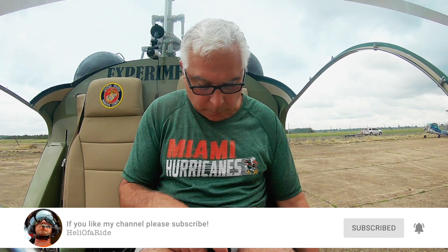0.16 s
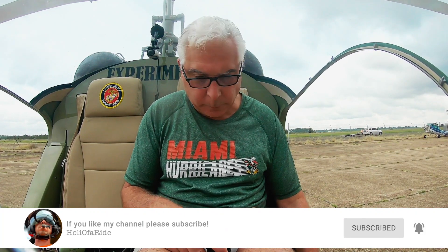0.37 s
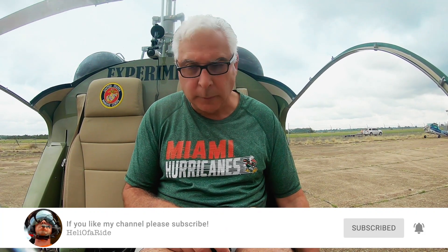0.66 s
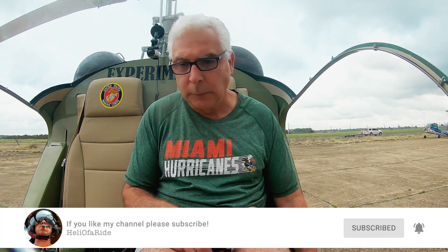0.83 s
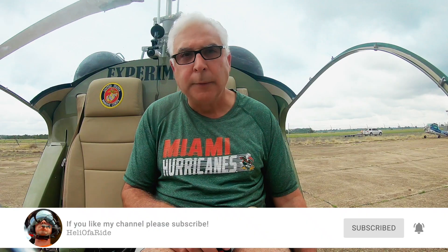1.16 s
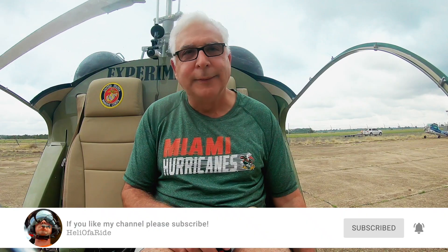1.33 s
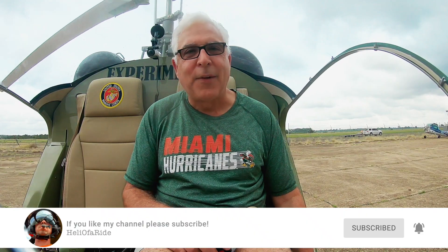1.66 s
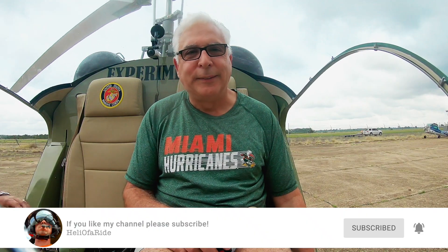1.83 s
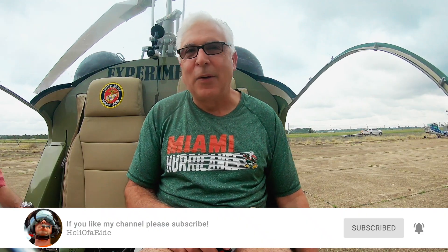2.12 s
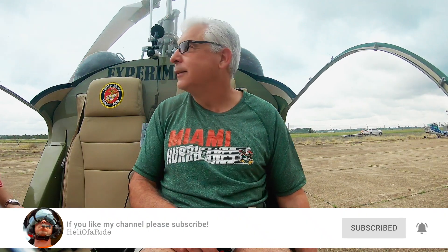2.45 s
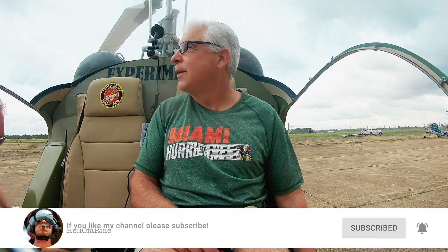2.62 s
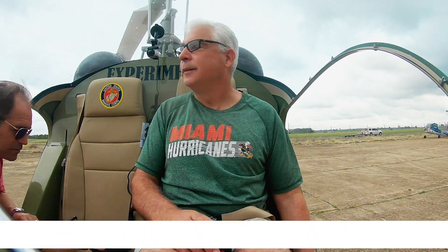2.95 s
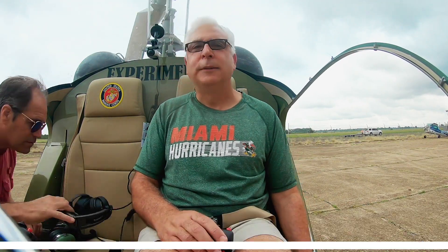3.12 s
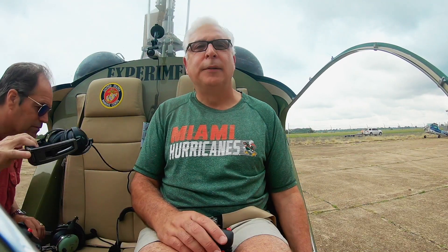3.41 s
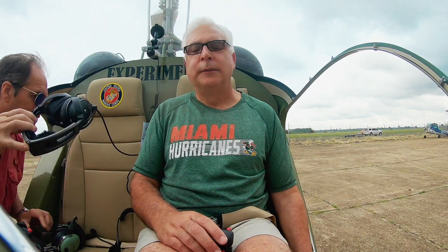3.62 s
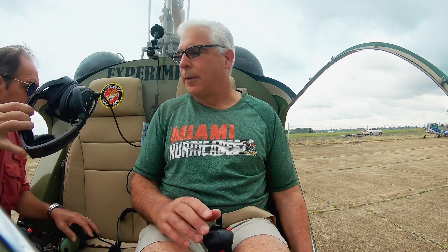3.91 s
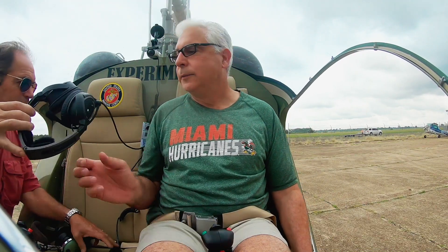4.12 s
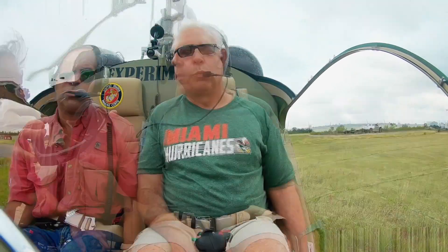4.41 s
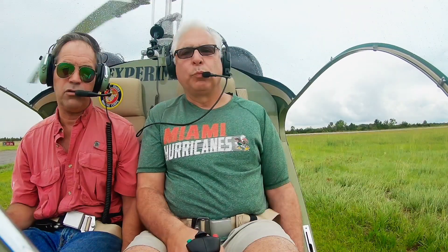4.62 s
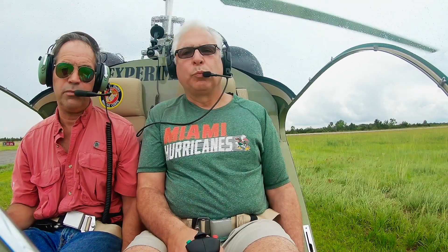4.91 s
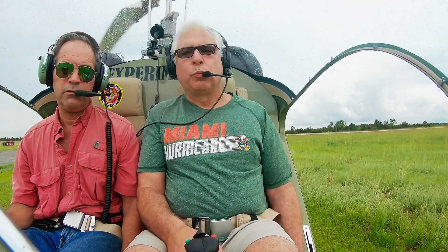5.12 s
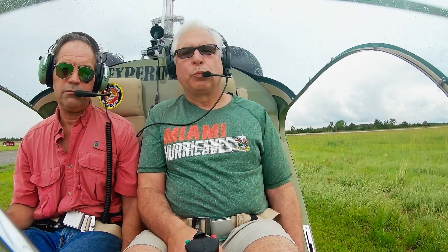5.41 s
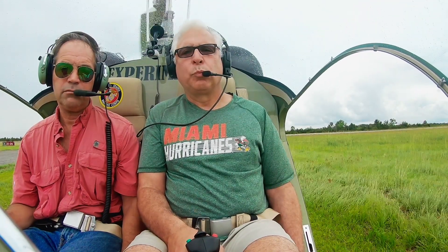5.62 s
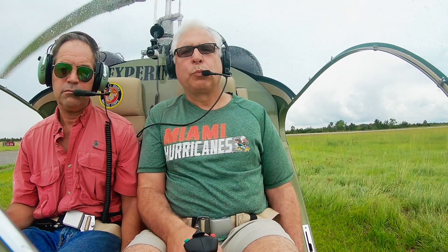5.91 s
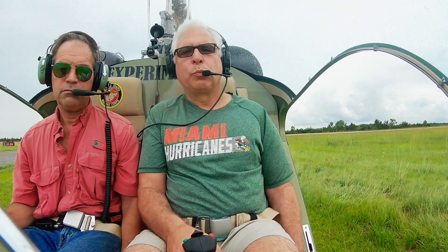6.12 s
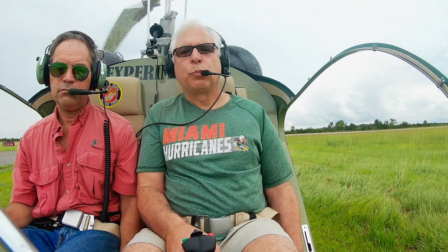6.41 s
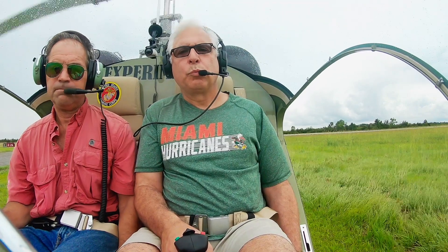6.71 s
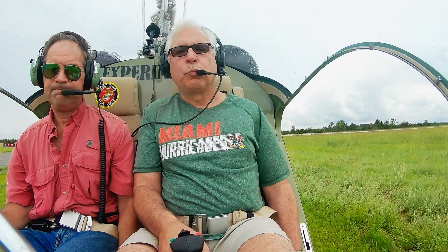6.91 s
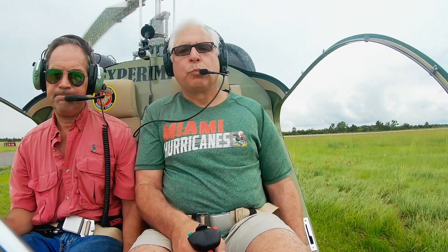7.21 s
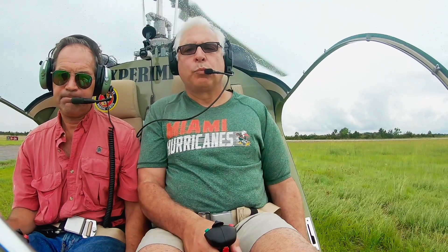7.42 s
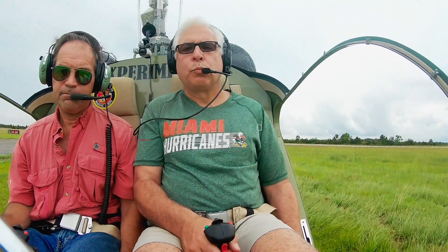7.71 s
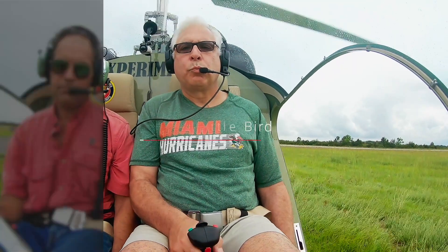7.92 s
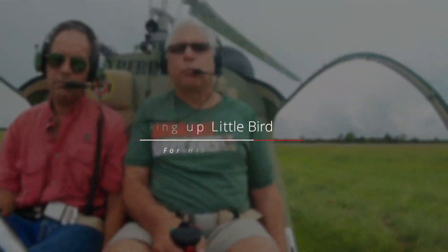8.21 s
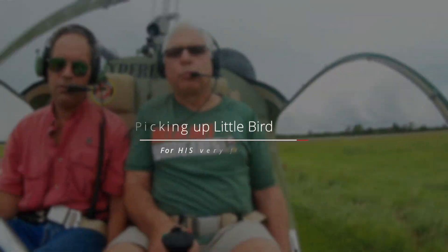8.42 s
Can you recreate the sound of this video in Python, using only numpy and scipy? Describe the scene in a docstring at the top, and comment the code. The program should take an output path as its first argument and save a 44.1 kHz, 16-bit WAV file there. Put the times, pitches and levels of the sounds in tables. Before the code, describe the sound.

Heard close up from the seats of an open helicopter outdoors, a piston engine lopes unevenly at idle, its low exhaust throb mixed with ringing knocks, rattling covers and faint ticking. It briefly races and falters. Midway, a quick change brings a higher, even drone with an exhaust rasp, and rushing air from the rotor gradually builds beneath it as the engine takes up load.

```python
"""Piston helicopter, open cockpit

An eight-cylinder engine is heard from just in front of the seats. At idle, unequal firings give a
lopping, stumbling exhaust boom, impacts ring the casing, the valve train hisses and gear rustles.
The scene then changes to a faster, fuller run on a field: periodic firings make a line spectrum and a
rasp, and the turbulent wash of the rotor slowly grows as it takes up load."""
import sys
import numpy as np
from scipy import signal
from scipy.fft import rfft, irfft
from scipy.io import wavfile

SR = 44100
rng = np.random.default_rng(int(sys.argv[2]) if len(sys.argv) > 2 else 0)


def inscribe(sig):
    """Save sig as 16-bit PCM at rate SR to the path in sys.argv[1].

    A 1-D sig is mono; a 2-D sig holds one channel per row.
    Samples are clipped to [-1, 1] before scaling.
    """
    pcm = np.round(np.clip(np.atleast_2d(sig).T, -1, 1) * 32767)
    wavfile.write(sys.argv[1], SR, pcm.astype(np.int16))


N = 377055
T = np.arange(N) / SR

# gear handled in the cabin: centre_s, length_s, level_db
GEAR_RUSTLES = [(.81, 0.047, -74), (2.618, 0.023, -69), (2.647, 0.045, -67), (2.876, 0.036, -72),
                (3.47, 0.046, -74)]
# spectral envelopes of the noises, as relative densities: frequency_hz, level_db
RUSTLE_SPECTRUM = [(2000, -16), (3500, -11), (5200, 2.5), (7000, -11.5), (9500, -18), (13000, -31)]
TAPPET_SPECTRUM = [(3800, -10.5), (5300, 7), (7000, -7.5), (9000, -10.5), (11500, -27), (14000, -39)]
VALVE_SPECTRUM = [(1760, -30.5), (3000, -14.5), (3600, -18), (4420, -4), (5320, -1.5), (6000, -3.5),
                  (7020, -19.5), (9130, -29), (15400, -120)]
CLATTER_SPECTRUM = [(500, -27.5), (700, 17.5), (1100, -9), (1400, -7), (1850, -9.5), (2300, -17.5),
                    (3000, -25), (4000, -46)]
RUMBLE_SPECTRUM = [(15, -23.5), (30, -7.5), (50, -5.5), (75, 1), (100, -1.5), (125, -6), (150, -15),
                   (185, -7), (220, -17), (270, -10), (320, -19), (420, -24), (580, -21), (900, -23.5)]
RUN_HISS_SPECTRUM = [(1500, -30), (2400, -5), (3130, -13), (3520, -14), (4600, -2), (5000, -2), (5840, -4),
                     (7020, -17), (8300, -21), (9500, -28), (11300, -41), (12800, -39), (14500, -48)]
WASH_SPECTRUM = [(8, -8), (35, -3), (60, 1), (100, 1), (130, -7.5), (170, -1.5), (260, -3.5), (330, -8),
                 (400, -13.5), (650, -11.5), (1000, -14.5), (1600, -22.5), (3000, -45.5)]
BARK_SPECTRUM = [(250, -17), (340, -1.5), (400, -9), (480, -1), (580, -9), (660, -6), (780, -3.5),
                 (900, -4), (1000, -3.5), (1120, -9), (1400, -12.5), (1900, -16.5), (2400, -28),
                 (3200, -46)]
# slow hunting of the idle: time_s, firing_rate_hz
IDLE_FIRING_RATE = [(0, 67.24), (0.65, 62.81), (1, 66.0), (1.3, 63.53), (1.8, 66.93), (2.3, 64.72),
                    (2.9, 66.47), (3.5, 65.46)]
# the idle races briefly, then runs weak: centre_s, extra_rate_hz, boom_loss_db
IDLE_SURGES = [(1.57, 8.67, 2.5), (3.2, 3.8, 5)]
# the cylinders at idle, in firing order: boom_db, lateness_firings
FIRING_ORDER = [(3, -0.011), (2, 0.056), (1.5, -0.067), (2.7, -0.019), (1.3, -0.058), (-2.5, 0.12),
                (3.4, -0.00062), (0.5, 0.095)]
# brief dips of the boom: time_s, boom_loss_db
BOOM_DIPS = [(.197, 20), (0.579, 3.5), (.94, 7), (1.785, 8), (2.51, 5), (2.904, 15), (2.995, 16),
             (3.17, 11), (3.24, 18), (3.35, 3)]
# modes of the engine casing: pitch_hz, bandwidth_hz, gain_db
CASING_MODES = [(659.6, 12, 24.5), (710, 36, 8), (775.7, 11, 21.5), (815, 29, -12.5), (900, 110, -15)]
# modes of the thin engine covers: pitch_hz, bandwidth_hz, gain_db
COVER_MODES = [(960, 52, 6), (1050, 140, -11.5), (1130, 93, -6.5), (1310, 5.7, 1), (1480, 40, -13.5),
               (1690, 100, -22.5)]
# knocks of one engine cycle: place_firings, pitch_hz, gain_db
CYCLE_KNOCKS = [(.4, 691, -4), (1.3, 749, -3.5), (3.0, 950, -8), (3.4, 785, -1), (4.099, 973, -8),
                (4.351, 787, -1.5), (5.449, 722, -3.5), (6.2, 1005, -10.5), (6.45, 787, -3), (7.3, 761, -3),
                (7.549, 667.5, -4)]
# moments when the knocks change in force, nearly all harder: time_s, gain_db
KNOCK_ACCENTS = [(0.236, 4.5), (0.58, 1), (1.044, 4.5), (1.29, 6.5), (1.416, 6), (1.535, 7.5), (1.565, 8),
                 (1.595, 5.5), (1.647, 7), (1.944, 5), (2.066, 6), (2.25, 3), (2.558, 2), (2.737, 4.5),
                 (2.861, 4.5), (3.041, 3.5), (3.276, -2)]
# upward creep of the fast run: time_s, firing_rate_hz
RUN_FIRING_RATE = [(4.4, 88.87), (6.3, 89.83), (7.3, 90.12), (7.8, 90.6), (8.55, 90.9)]
# lines of the fast run, the fractional ones drive-train hums: crank_multiple, light_db, loaded_db
ENGINE_ORDERS = [(1.47, -18, -15), (2, -16, -15), (2.73, -23, -18), (2.87, -26, -20), (3, -15, -16),
                 (4, 0, 0), (4.27, -28, -26), (4.73, -28, -22), (5, -17, -15), (7, -25, -11),
                 (7.27, -28, -21), (8, -18, -14), (9, -22, -9), (10, -14, -13), (10.73, -23, -21),
                 (11, -.3, -2.5), (12, -7.5, -3), (13, -15, -13), (14, -7.5, -10.5), (15, -17, -20),
                 (16, -21, -25), (17, -22, -22), (18, -23, -30), (20, -20, -24), (21, -14, -16),
                 (22, -16, -24), (23, -21, -27), (24, -14, -18), (25, -27, -22), (26, -23, -30),
                 (27, -20, -23), (29, -15, -25), (30, -25, -19), (31, -26, -21), (32, -32, -24),
                 (33, -21, -30), (34, -16, -26), (35, -18, -24), (36, -21, -32), (38, -16, -29),
                 (39, -20, -28), (40, -12, -23), (41, -18, -25), (42, -20, -27), (43, -19, -30),
                 (44, -12, -25), (45, -15, -19), (47, -26, -26), (48, -23, -34)]

CYLINDER_COUNT = len(FIRING_ORDER)
EQUAL_DB = np.zeros(CYLINDER_COUNT)  # cylinders of equal strength
CHANGE_S, CROSSFADE_S = 4.455, 0.14  # the idle gives way to the fast run
LOAD_START_S, LOAD_RISE_S = 5.47, 1.68  # the rotor takes up load


def amp(db):
    """Amplitude ratio of a level in decibels."""
    return 10 ** (np.asarray(db) / 20)


def unit(x):
    """Normalisation to rms 1."""
    return x / np.sqrt(np.mean(x ** 2) + 1e-20)


def curve(rows):
    """Linear interpolation of a timed table at every sample."""
    return np.interp(T, *np.transpose(rows))


def bump(offset_s, width_s):
    """Gaussian pulse that falls to 1/e at width_s from its centre."""
    return np.exp(-(offset_s / width_s) ** 2)


def noise():
    """Gaussian white noise."""
    return rng.standard_normal(N)


def wander(hz):
    """Low-pass noise: a random fluctuation of rms 1."""
    f = np.fft.rfftfreq(N, 1 / SR)
    return unit(irfft(rfft(noise()) / (1 + (f / hz) ** 4), N))


def colour(x, spectrum):
    """Minimum-phase filtering imposes a spectral envelope; the result has rms 1."""
    size = 8192
    hz, db = np.transpose(spectrum)
    log_hz = np.log(np.fft.rfftfreq(size, 1 / SR) + 1)
    outside = abs(log_hz - np.clip(log_hz, np.log(hz[0]), np.log(hz[-1])))
    gain_db = np.interp(log_hz, np.log(hz), db) - 40 * outside
    log_gain = np.log(amp(np.maximum(gain_db, -100)))
    log_transfer = signal.hilbert(np.r_[log_gain, log_gain[-2:0:-1]]).conj()
    response = np.fft.ifft(np.exp(log_transfer)).real
    return unit(signal.oaconvolve(x, response[:size // 2])[:N])


def band(x, edges_hz):
    """Butterworth band-pass filter."""
    return signal.sosfilt(signal.butter(4, edges_hz, "band", fs=SR, output="sos"), x)


def resonate(x, hz, width_hz):
    """A damped resonator with unit gain at its peak."""
    r = np.exp(-np.pi * width_hz / SR)
    return 2 * signal.lfilter([1 - r], [1, -r * np.exp(2j * np.pi * hz / SR)], x).real


def ring(force, modes, edges_hz):
    """Modal superposition: a metal part responds as a sum of resonances, here scaled to rms 1."""
    return unit(band(sum(amp(db) * resonate(force, hz, width) for hz, width, db in modes), edges_hz))


def firings(fired, sizes_db, scatter_db, decay_s, rough):
    """Pulse train: at each whole count of fired, a cylinder's own burst mixes with fresh turbulence."""
    onsets = np.flatnonzero(np.diff(np.floor(fired)) > 0)
    cylinder = np.floor(fired[onsets + 1]).astype(int) % len(sizes_db)
    size = amp(np.asarray(sizes_db)[cylinder] + scatter_db * rng.standard_normal(len(onsets)))
    t = np.arange(1024) / SR
    own = rng.standard_normal((len(sizes_db), len(t)))
    fresh = rng.standard_normal((len(onsets), len(t)))
    shapes = np.sqrt(1 - rough) * own[cylinder] + np.sqrt(rough) * fresh  # rough is a share of power
    bursts = shapes * np.exp(-t / decay_s) * size[:, None]
    return np.bincount((onsets[:, None] + np.arange(len(t))).ravel(), bursts.ravel(), N)[:N]


def shudder(fired, start_firings=2.86, rise_firings=1.6):
    """Damped response to the heaviest knock of each cycle, 0-1: quick rise, slow fall."""
    age = (fired - start_firings) % CYLINDER_COUNT / rise_firings
    return age * np.exp(1 - age)


def rustles():
    """Friction of handled gear gives brief, soft scrapes of grainy noise."""
    envelope = sum(amp(db) * bump(T - s, length / 2) for s, length, db in GEAR_RUSTLES)
    grains = noise() * amp(1.5 * wander(hz=400))
    return envelope * colour(grains, RUSTLE_SPECTRUM)


def tappets(fired):
    """Small impacts in the valve gear, four to a firing, are loudest while the engine shudders."""
    ticks = firings(4 * fired, EQUAL_DB, scatter_db=2.5, decay_s=.0025, rough=1)
    return amp(-79) * colour(ticks * amp(5 * shudder(fired - .5)), TAPPET_SPECTRUM)


def valve_hiss(fired):
    """Amplitude modulation: valve noise swells with each cycle and throbs with its two crank turns."""
    swell = np.cos(2 * np.pi * (fired - 4.9) / CYLINDER_COUNT)
    throb = np.cos(2 * np.pi * 2 * (fired - 4.6) / CYLINDER_COUNT)
    level_db = -72 + 1.3 * swell + .9 * throb + .5 * wander(hz=25)
    return amp(level_db) * colour(noise(), VALVE_SPECTRUM)


def clatter(fired):
    """Irregular taps over steady noise, modulated in amplitude by the shudder."""
    taps = firings(fired - .62, EQUAL_DB, scatter_db=3, decay_s=.012, rough=.93)
    level_db = -50.5 + 1.7 * (shudder(fired) - 1)
    return amp(level_db) * colour(unit(taps) + noise(), CLATTER_SPECTRUM)


def rumble(fired, weak_db):
    """Turbulent exhaust pulses give low noise that sputters louder when the engine runs weak."""
    puffs = firings(fired, EQUAL_DB, scatter_db=.5, decay_s=.015, rough=.73)
    return amp(-41.5 + .59 * weak_db) * colour(puffs, RUMBLE_SPECTRUM)


def cover_rattle(fired):
    """Forced vibration of the thin covers, swelling with the shudder once a cycle."""
    buzz = unit(firings(fired, EQUAL_DB, scatter_db=.5, decay_s=.033, rough=.5))
    return ring(buzz * amp(3.9 * shudder(fired)), COVER_MODES, edges_hz=(836, 1980))


def casing_ring(fired, lag_firings=.32):
    """Impulse excitation: a blow after every firing keeps the casing modes ringing."""
    blows = firings(fired - lag_firings, EQUAL_DB, scatter_db=1, decay_s=.0022, rough=.3)
    return ring(blows, CASING_MODES, edges_hz=(644, 1090))


def chug(fired, rise_s=.001, decay_s=.008, jitter_s=.0002, scatter_db=1.2, detune=.012):
    """Free vibration: each knock of a repeating round rings its own part as a damped sinusoid."""
    t = np.arange(2048) / SR
    out = np.zeros(N + len(t))
    envelope = (1 - np.exp(-t / rise_s)) * np.exp(-t / decay_s)
    for cycle in range(36):
        for place, hz, db in CYCLE_KNOCKS:
            late, strong, sharp = rng.standard_normal(3)
            start_s = np.interp(cycle * CYLINDER_COUNT + place, fired, T) + jitter_s * late
            accent_db = sum(gain * bump(start_s - s, .01) for s, gain in KNOCK_ACCENTS)
            size = amp(-33.5 + db + accent_db + scatter_db * strong)
            tone = np.sin(2 * np.pi * hz * (1 + detune * sharp) * t)
            out[max(round(start_s * SR), 0):][:len(t)] += size * envelope * tone
    return band(out[:N], edges_hz=(620, 1250))


def idle_boom(fired, weak_db):
    """The muffler, an acoustic low-pass, rounds unequal firings into a loping near-sinusoid."""
    slots = np.arange(CYLINDER_COUNT) + .47
    strength_db, late = (np.interp(fired, slots, column, period=CYLINDER_COUNT)
                         for column in np.transpose(FIRING_ORDER))
    stumble_db = sum(db * bump(T - s, .011) for s, db in BOOM_DIPS)
    level_db = -28 + strength_db - weak_db - stumble_db + .17 * wander(hz=25)
    boom = np.sqrt(2) * amp(level_db) * np.cos(2 * np.pi * (fired - late))
    return signal.sosfilt(signal.butter(4, 135, fs=SR, output="sos"), boom)


def idle():
    """Synchronous sources: one running count of firings times every sound of the idling engine."""
    racing_hz = sum(extra * bump(T - s, .075) for s, extra, _ in IDLE_SURGES)
    fired = np.cumsum(curve(IDLE_FIRING_RATE) + racing_hz) / SR
    weak_db = sum(db * bump(T - s - .081, .13) for s, _, db in IDLE_SURGES)
    weak_db += 3.5 * np.exp(-(T / .25) ** 4)  # the idle also begins weak, and recovers
    noises = rumble(fired, weak_db) + clatter(fired) + valve_hiss(fired)
    metal = amp(-48.5 - .05 * racing_hz) * (casing_ring(fired) + amp(-4.5) * cover_rattle(fired))
    return noises + metal + chug(fired) + idle_boom(fired, weak_db) + tappets(fired)


def run_hiss():
    """High-frequency noise with a slight random amplitude modulation."""
    return amp(-59) * colour(noise(), RUN_HISS_SPECTRUM) * amp(.5 * wander(hz=40))


def rotor_wash(load):
    """Turbulence in the air driven by the rotor radiates low, gusty noise that grows with load."""
    gusts = noise() * amp(.74 * wander(hz=13))
    return amp(-40 + 4 * load) * colour(gusts, WASH_SPECTRUM)


def bark(fired, load):
    """Turbulent bursts rasp at the firing rate; the four of each crank turn differ in strength."""
    rasp = firings(fired, [.53, -.5, .59, -1.4], scatter_db=.5, decay_s=.018, rough=.7)
    return amp(-41 - 1.5 * load) * colour(rasp, BARK_SPECTRUM)


def engine_lines(crank_turns, load, flutter_hz=20, dispersion_cycles=.14):
    """Periodic exhaust flow and drive-train hum form a line spectrum, reshaped by load."""
    boom_db = -25.5 - 1.5 * np.maximum(T - 6, 0)  # the boom recedes from 6 s on
    drone_db = -34.5 + 3.5 * load  # the drone of the pipe grows
    out, step = np.zeros(N), SR // flutter_hz
    for order, light_db, loaded_db in ENGINE_ORDERS:
        base_db = boom_db if order < 6 else drone_db
        level_db = (base_db + light_db + load * (loaded_db - light_db))[::step]
        flutter_db = 2 * order / 40 * rng.standard_normal(len(level_db))  # high lines flutter most
        envelope = np.interp(T, T[::step], np.sqrt(2) * amp(level_db + flutter_db))
        # dispersion: the pipe delays higher lines more, spreading its ring over the crank turn
        phase_cycles = order * crank_turns - dispersion_cycles * order ** 2
        out += envelope * np.cos(2 * np.pi * phase_cycles)
    return out


def fast_run():
    """Superposition of engine tones and broadband noise as the rotor takes up load."""
    firing_hz = curve(RUN_FIRING_RATE) * (1 + .001178 * wander(hz=9))
    fired = np.cumsum(firing_hz) / SR
    load = np.clip((T - LOAD_START_S) / LOAD_RISE_S, 0, 1)
    return engine_lines(fired / 4, load) + bark(fired, load) + rotor_wash(load) + run_hiss()


def scene():
    """A quick crossfade joins the idle to the fast run."""
    blend = np.clip((T - CHANGE_S) / CROSSFADE_S + .5, 0, 1)
    return (np.sqrt(1 - blend) * (idle() + rustles()) + blend * fast_run())[None]


def record(dry):
    """Short fades soften the ends, and a linear-phase low-pass limits the band to 15 kHz."""
    fades = np.clip(np.minimum(T, T[-1] - T) / .004, 0, 1)
    low_pass = signal.firwin(511, 15000, window=("kaiser", 9), fs=SR)
    return signal.oaconvolve(dry * fades, low_pass[None], "same")


dry = scene()
out = record(dry)
inscribe(out)
```